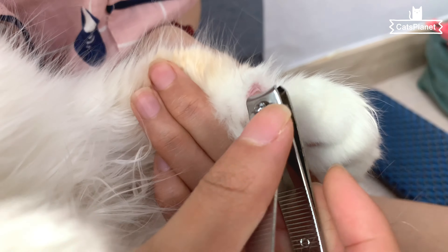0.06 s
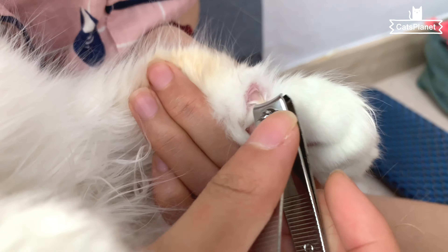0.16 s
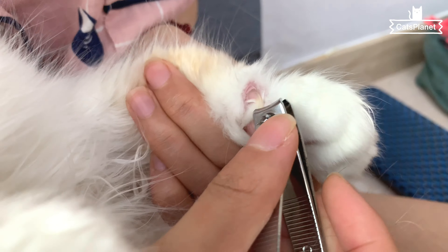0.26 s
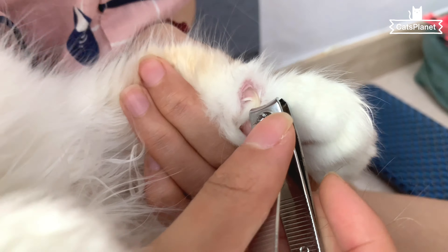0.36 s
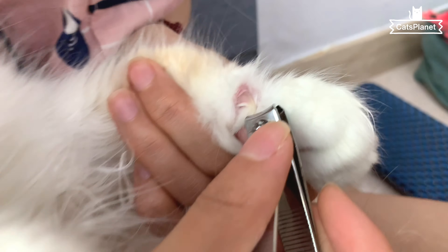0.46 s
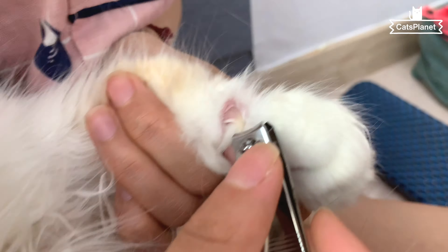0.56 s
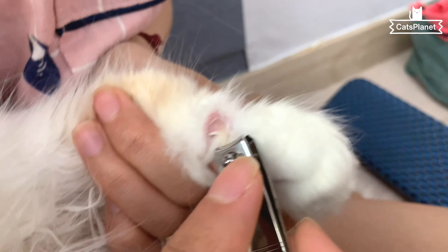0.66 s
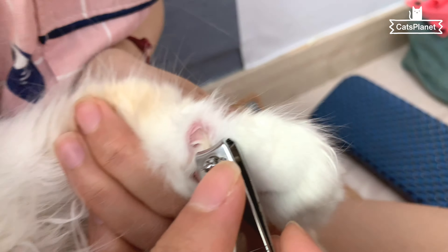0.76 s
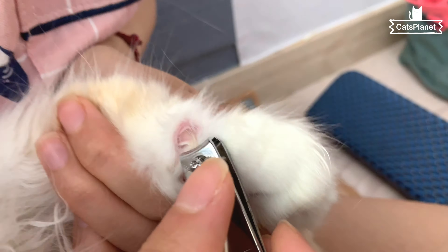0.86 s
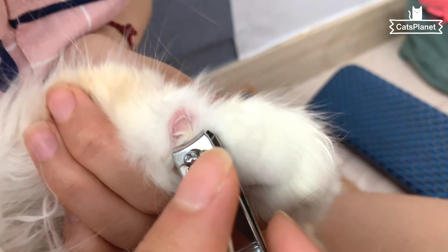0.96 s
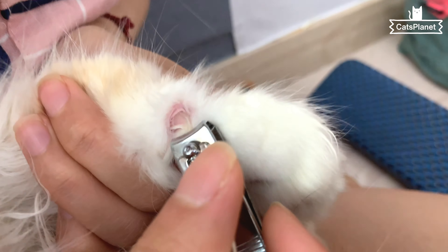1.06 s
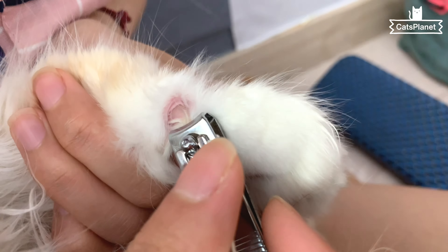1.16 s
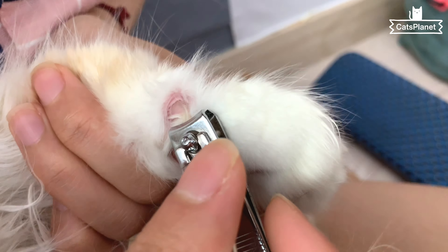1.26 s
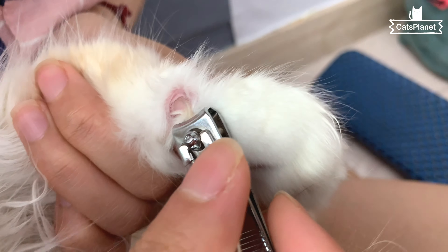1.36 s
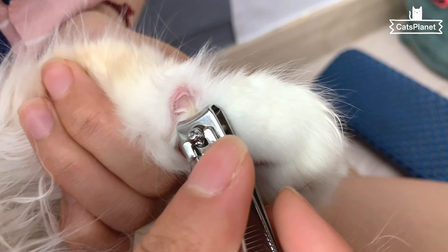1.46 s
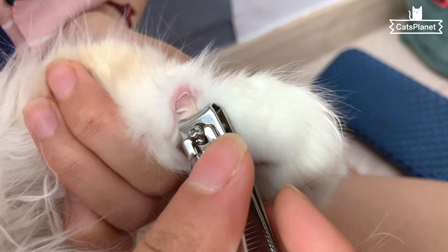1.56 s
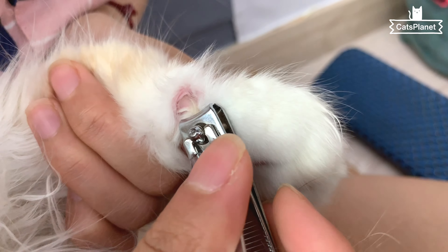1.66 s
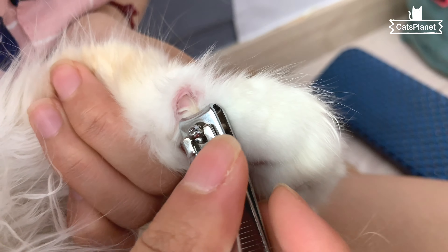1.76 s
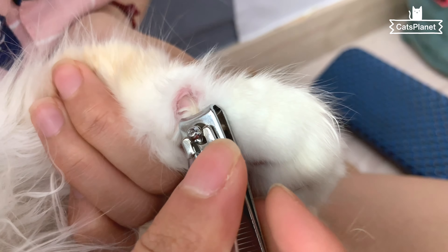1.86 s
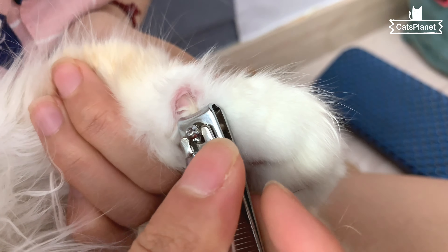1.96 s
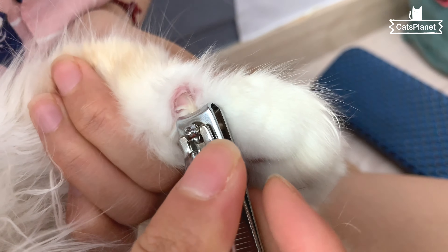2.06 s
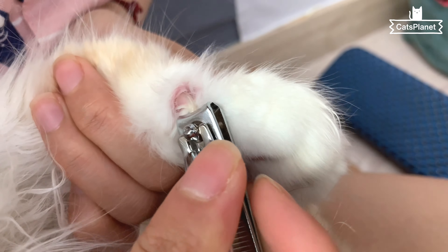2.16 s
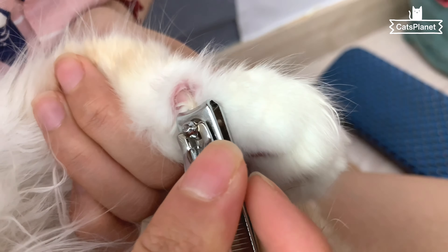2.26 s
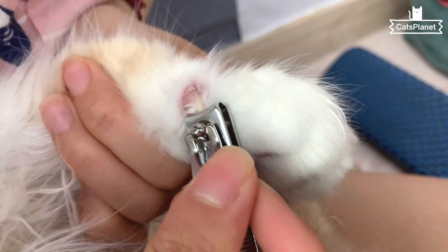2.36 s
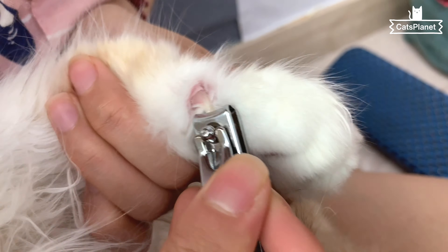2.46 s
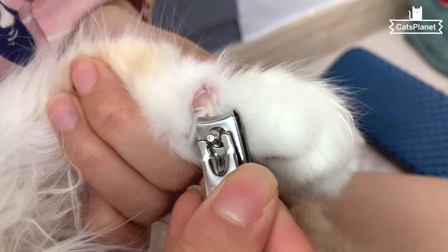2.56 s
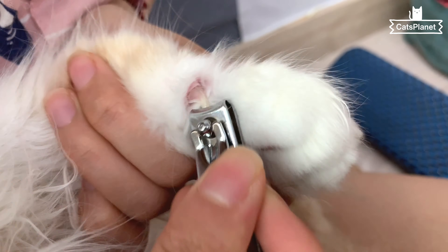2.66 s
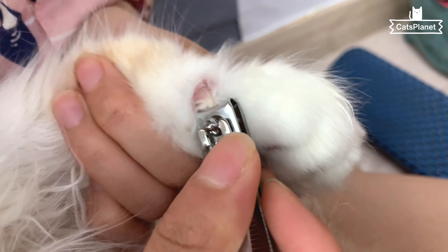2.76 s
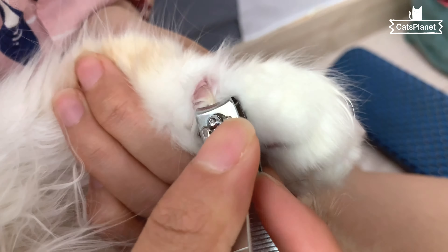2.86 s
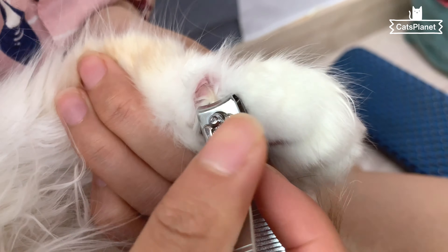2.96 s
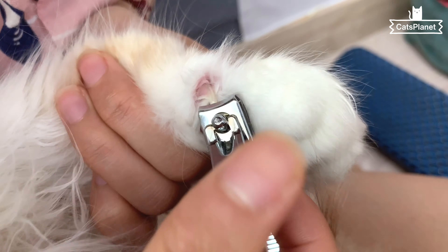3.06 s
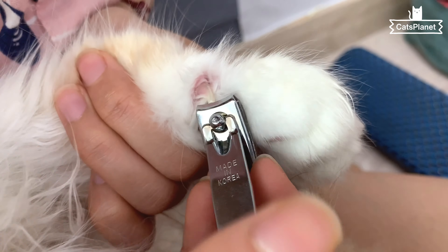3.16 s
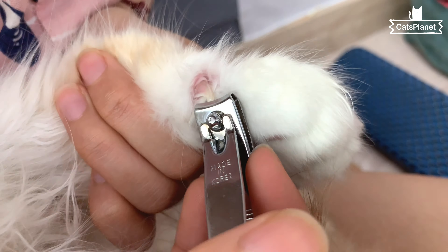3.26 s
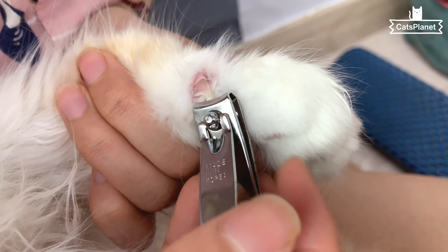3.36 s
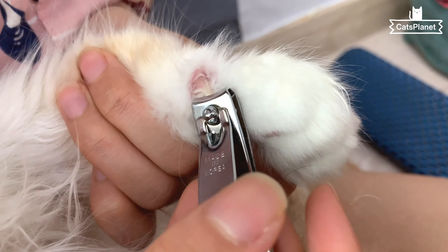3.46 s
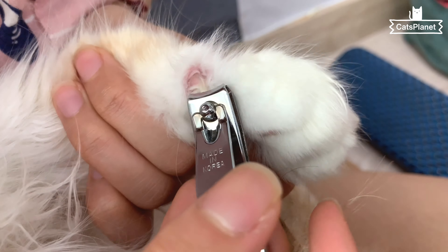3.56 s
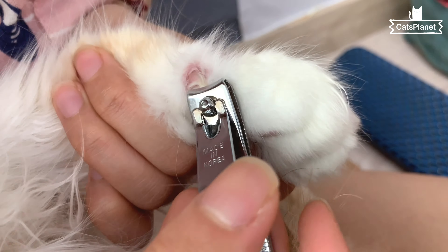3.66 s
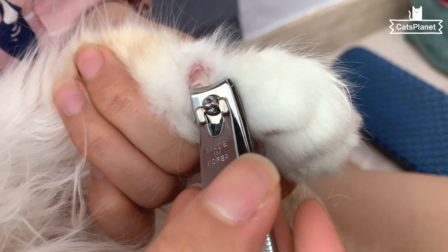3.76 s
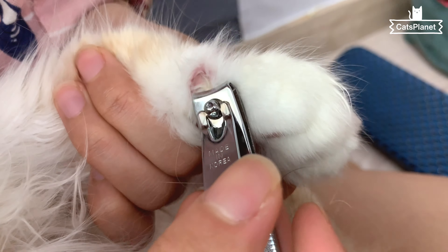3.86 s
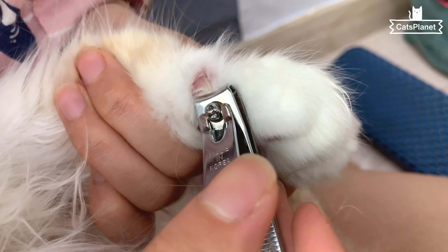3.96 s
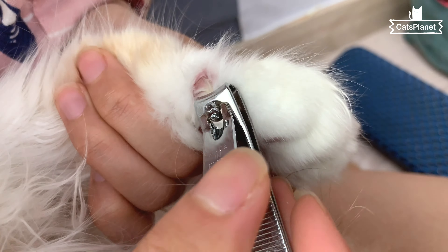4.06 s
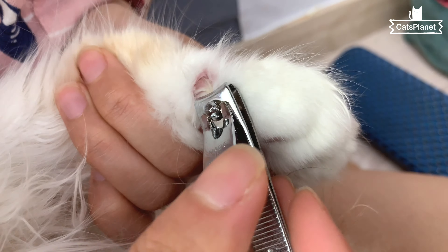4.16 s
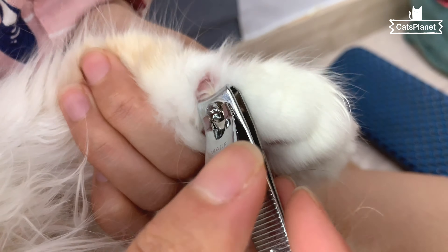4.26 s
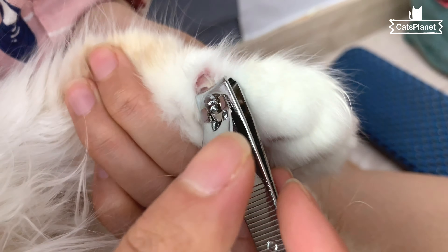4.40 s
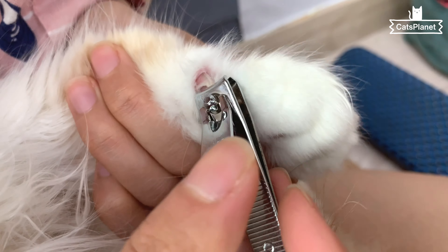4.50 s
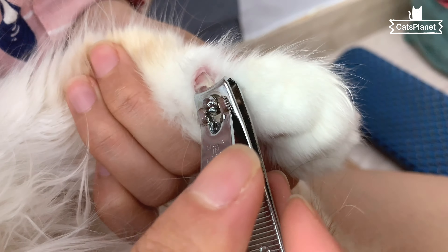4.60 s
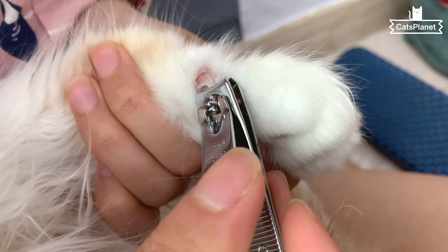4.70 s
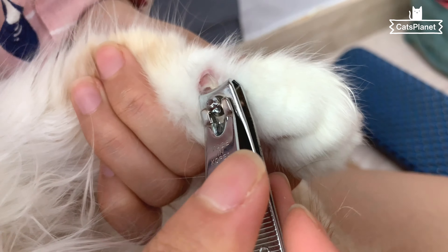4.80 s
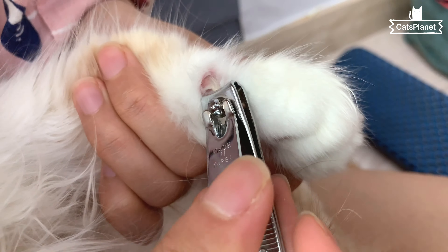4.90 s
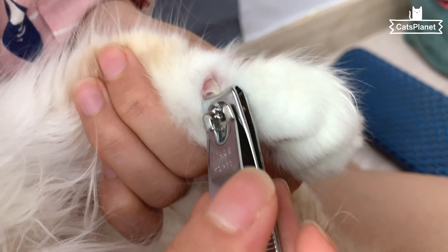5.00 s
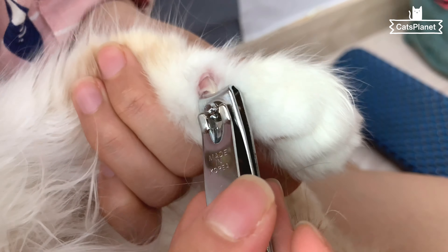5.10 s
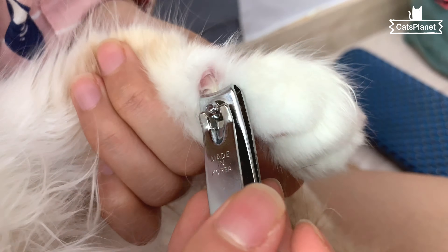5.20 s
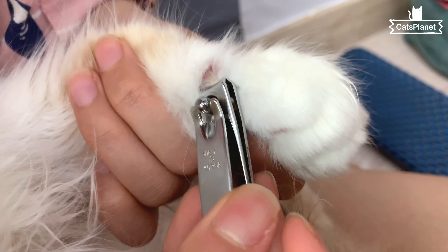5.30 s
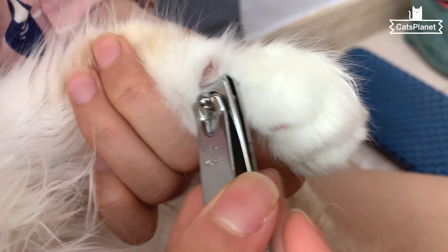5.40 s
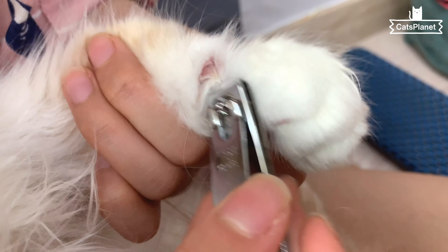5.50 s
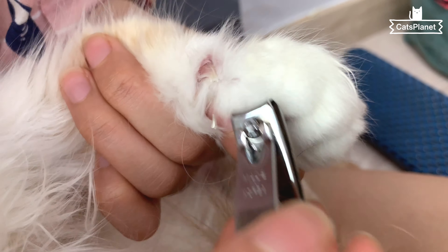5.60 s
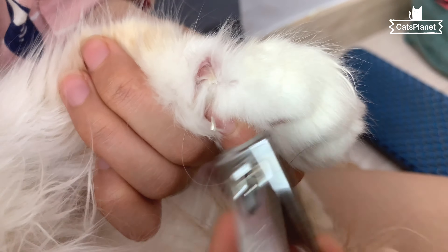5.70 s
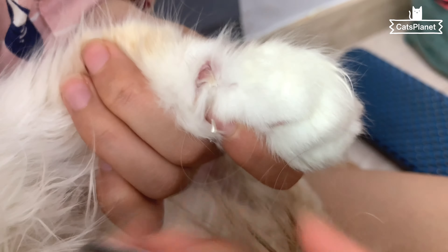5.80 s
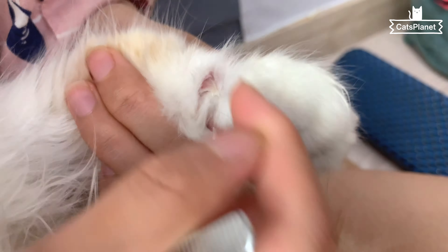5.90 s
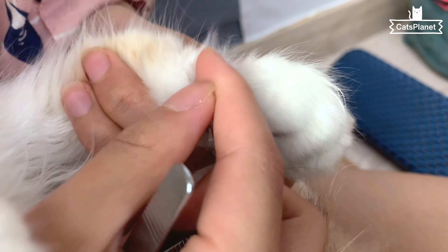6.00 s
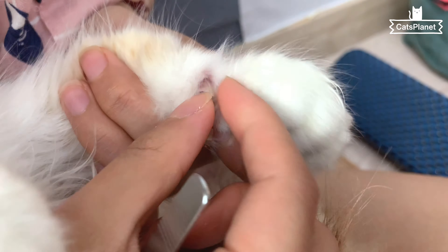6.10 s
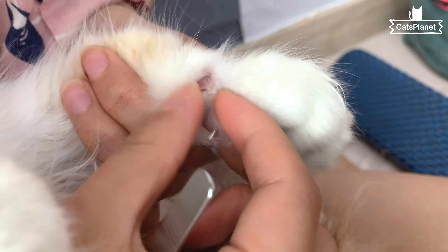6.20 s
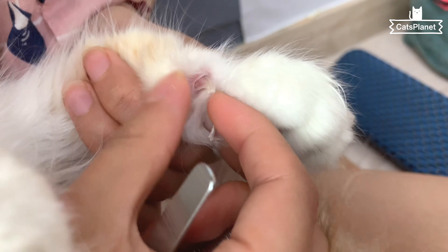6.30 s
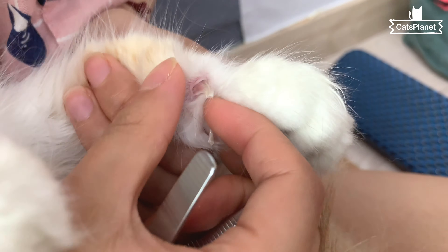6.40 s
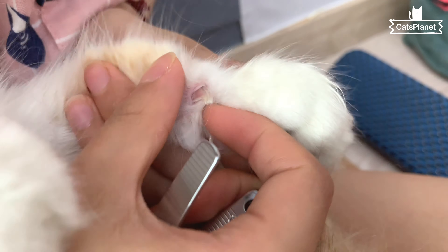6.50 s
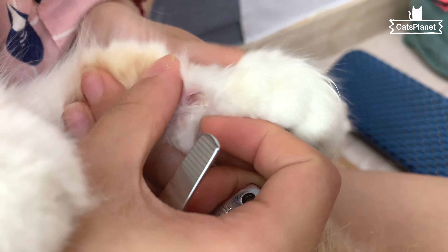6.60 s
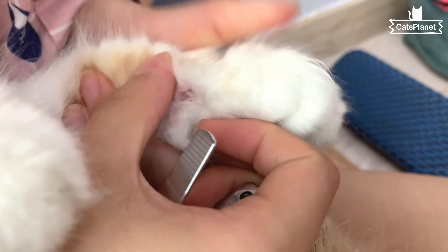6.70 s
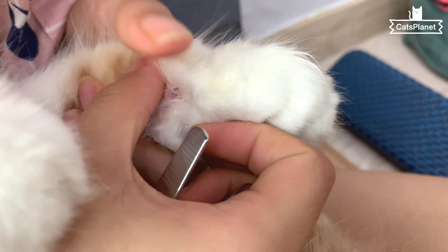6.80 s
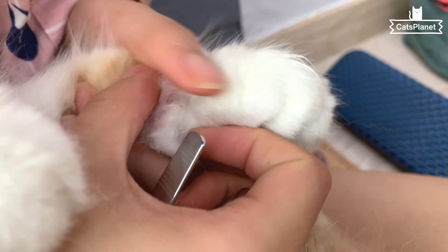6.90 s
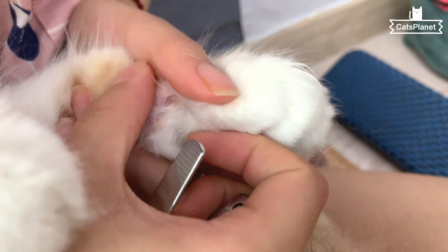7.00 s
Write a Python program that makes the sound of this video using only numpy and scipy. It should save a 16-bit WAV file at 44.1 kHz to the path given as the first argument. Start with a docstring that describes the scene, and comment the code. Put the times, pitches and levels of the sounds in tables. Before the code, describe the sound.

A low steady ventilation rumble with soft hum and faint hiss runs throughout, heard by a close stereo microphone in a small room. Tiny metallic ticks come at 0.6 to 1.0 s, and a faint squeaky scrape and rattle from 1.6 to 1.9. At 1.96 a dull knock, then at 2.14 a crisp crack of claw. From 2.25 to 2.7 the clipper jaws tick irregularly, with gritty crackle and small squeaks; sharper clicks stand out at 2.28, 2.43 and 2.63. Light taps and lever rattles follow until 3.15. Then mostly rumble, with a soft tap at 3.67 and a very faint one at 4.69. From 4.94 small ticks and crackles build; a crack at 5.26 with a short squeak leads into the loudest snap at 5.285, with bright steel ringing about a quarter second and a low jolt. A chip ticks down at 5.39. Faint rattle and rubbing at 5.6 to 6.1, a barely audible tap at 6.88, rumble to about 7 s.

```python
"""A low, steady room rumble with hum and faint hiss comes first; then a small steel clipper ticks on a cat's claw.
The jaws scrape, squeak and rattle; the claw crackles, cracks once, then snaps off as the steel rings; a chip lands.
Breaks, grains and crackle are noise bursts driven through resonances of steel and claw; knocks are short sine swings.
Two nearby microphone ports hear it all, with sparse room reflections; a gain control dips after loud sounds."""
import sys
import numpy as np
from scipy import signal
from scipy.fft import rfft, irfft
from scipy.io import wavfile
from scipy.ndimage import uniform_filter1d

SR = 44100
rng = np.random.default_rng(int(sys.argv[2]) if len(sys.argv) > 2 else 0)


def transcribe(signal):
    """Save signal, clipped to [-1, 1], as a 16-bit WAV file at the path in sys.argv[1]."""
    frames = np.atleast_2d(signal).T
    limited = np.clip(frames, -1, 1)
    pcm = np.round(limited * 32767).astype(np.int16)
    wavfile.write(sys.argv[1], SR, pcm)


N = 310905

# The jaws slip and tick: (time [s], level [dB], extra level of the three lower rings [dB])
TICKS = [(0.641, -42.5, 4.5), (0.744, -33.5, -3), (1.039, -49.5, 2), (2.042, -44, 0.5), (2.046, -42.5, -8),
         (2.1085, -46, -4.5), (2.1237, -38.5, 4), (2.2492, -29.5, -0.5), (2.2672, -36, -0.5),
         (2.2755, -26, -5), (2.2788, -16, 0), (2.289, -36.5, 3), (2.311, -46.5, 6), (2.323, -31.5, 8),
         (2.3334, -45, 9.5), (2.3446, -36.5, 8.5), (2.362, -44.5, 12.5), (2.404, -40, 13), (2.422, -46, 11),
         (2.4315, -12.5, 7), (2.4943, -30.5, 3.5), (2.505, -38.5, 3), (2.5108, -33.5, 5),
         (2.548, -46, -0.5), (2.556, -31, 0), (2.569, -45.5, 6), (2.629, -7.5, -4.5), (2.646, -24, 4),
         (2.6799, -31.5, -2), (4.935, -42.5, 5.5), (4.953, -50.5, 1.5), (5.095, -29, -8),
         (5.1384, -47, -3.5), (5.152, -45, -1.5), (5.184, -22.5, -6.5), (5.193, -36, -2.5),
         (5.217, -27, -1), (5.222, -37, -8.5), (5.2374, -43.5, -4), (5.2474, -29, -9.5)]
# A slip excites the top of the steel most: levels of the (top, high, middle, low) ring [dB]
TICK_COLOUR_DB = (-3.5, -23.5, -14.5, -35.5)
# The slack lever rattles on its pin: (time [s], level [dB], centre [Hz], ping level [dB])
RATTLES = [(1.7797, -56, 9860, -44.5), (1.818, -51, 9750, -41), (1.835, -54, 10100, -48),
           (1.857, -49, 10400, -41.5), (2.878, -32.5, 8550, -39), (2.942, -41.5, 7650, -39),
           (3.074, -49, 10720, -34), (3.107, -47, 8660, -46.5), (3.123, -62, 10600, -54),
           (3.137, -51, 10640, -47), (5.615, -34, 10500, -55)]
# The claw fractures, in several stages at the final snap: (time [s], top ring [dB], high ring [dB],
# middle ring [dB], low ring [dB], tearing time scale [ms], send to the room [dB], free ring [dB])
CRACKS = [(2.137, -12, -16.5, -19.5, -21, 1.4, -19, -42), (5.257, -11, -28, -21, -21, 0.52, -26.5, -38.5),
          (5.2831, -28.5, -32.5, -15, -24.5, 1.6, -19.5, -36.5),
          (5.2848, -8, -19, -14.5, -27, 0.79, -12.5, -23),
          (5.2878, -15.5, -13.5, -28.5, -19, 0.3, -14.5, -40)]


def bites(tick_tear_ms=0.173, rattle_tear_ms=0.33, tick_room_db=-24, rattle_room_db=-22):
    """Ticks, rattles and cracks break sharply against the steel; also returns the share sent into the room."""
    hits = []
    for s, db, body_db in TICKS:
        body = body_db * np.array([0, 1, 1, 1])
        hits.append((s, db + np.array(TICK_COLOUR_DB) + body, tick_tear_ms, tick_room_db))
    for s, db, centre_hz, _ in RATTLES:
        hits.append((s, db + contact(centre_hz), rattle_tear_ms, rattle_room_db))

    near, spread = np.zeros((2, N))
    steel = free_ring()
    for s, *levels_db, tear_ms, room_db, ring_db in CRACKS:
        hits.append((s, levels_db, tear_ms, room_db))
        add(near, s, gain_of(ring_db) * steel)

    for s, levels_db, tear_ms, room_db in hits:
        sound = slip(s, levels_db, tear_ms)
        add(near, s, sound)
        add(spread, s, gain_of(room_db) * sound)
    return near, spread


# Resonances of the clipper with the claw in it, in four groups:
# (frequency [Hz], width of each filter pass [Hz], relative level [dB])
TOP_RING = [(12100, 860, 4), (12290, 790, -2.5), (13790, 905, 0), (14260, 600, -1), (15270, 730, -4)]
HIGH_RING = [(8510, 1400, 0.5), (9940, 1460, 2)]
MIDDLE_RING = [(6633, 2600, -5), (7250, 1300, 7.5), (8000, 345, 0)]
LOW_RING = [(999, 1600, -3), (1799, 1460, 1.5), (2866, 2700, 2), (3910, 1990, 1), (5200, 1700, 3)]
# Pitch of the first top resonance during slips: (time [s], frequency [Hz])
JAW_PITCH = [(.7, 12200), (2.13, 11400), (2.3, 11570), (2.43, 11680), (2.63, 11870), (5.25, 11760)]


def slip(s, levels_db, tear_ms, after_db=-17, after_ms=5, colour_db=2.5):
    """A sharp break, smeared over the tearing time, rings the steel; the grip retunes and recolours it each time."""
    ms = 1000 * np.arange(2048) / SR
    # each frequency of the click arrives with its own random delay
    scatter = evened(signal.oaconvolve(rng.standard_normal(1040), np.hanning(16), "valid"))
    delay = SR / 1000 * (.15 + tear_ms * abs(scatter) * .7)  # samples
    phase = 2 * np.pi * np.cumsum(delay) / len(ms)
    tear = irfft(np.exp(-1j * phase)) * (ms < 20)
    crumbs = rng.standard_normal(len(ms)) * np.exp(-ms / after_ms)
    force = evened(tear) + gain_of(after_db) * evened(crumbs)

    grip = 1 + 0.007 * rng.standard_normal()
    jaw_hz = np.interp(s, *np.transpose(JAW_PITCH))
    top = [(jaw_hz, *TOP_RING[0][1:]), *TOP_RING[1:]]
    out = 0
    for db, modes in zip(levels_db, (top, HIGH_RING, MIDDLE_RING, LOW_RING)):
        gripped = [(hz * grip, width_hz, mode_db + colour_db * rng.standard_normal())
                   for hz, width_hz, mode_db in modes]
        tone = ring(force, gripped)
        loudness = np.sqrt(np.sum(tone ** 2) / (.004 * SR))  # its energy as if packed into 4 ms
        out = out + gain_of(db) * tone / loudness
    return out


# The steel rings on once the jaws are freed, in clusters of close partials:
# (frequency [Hz], spread to either side [Hz], relative level [dB], time to fall by 60 dB [s])
FREE_RING = [(1810, 270, -30, 0.285), (2880, 15, -27.5, .26), (3354, 20, -28.5, .26),
             (3700, 110, -26.5, .22), (4115, 15, -30.5, 0.24), (4320, 13, -22.5, 0.29),
             (4460, 40, -22, .28), (5150, 36, -22, .28), (5860, 28, -21, 0.27), (6245, 34, -22.5, .3),
             (6660, 60, -20, 0.26), (7130, 97, -19.5, 0.27), (8250, 88, -17.5, .28),
             (8900, 500, -17.5, .26), (10100, 700, -11.5, .26), (12450, 400, -16, 0.22),
             (13300, 550, -7.5, .25), (14200, 400, -1.5, 0.29), (14700, 70, -2.5, .25),
             (14600, 190, 2.5, .23), (15070, 120, 12.5, 0.022)]


def free_ring(count=10):
    """The long, thin modes of the released clipper; close partials beat against each other."""
    t, out = np.arange(SR // 2) / SR, 0
    for hz, spread_hz, db, t60 in FREE_RING:
        place, phase = rng.random((2, count, 1))
        offset = 2 * (np.arange(count)[:, None] + place) / count - 1
        partials_hz = hz + spread_hz * offset
        fade = gain_of(-60 * t / t60)
        cluster = np.sin(2 * np.pi * (partials_hz * t + phase)).sum(0) * fade
        out = out + gain_of(db) * cluster * np.linalg.norm(fade) / np.linalg.norm(cluster)
    return out


# The blades press into the claw and it crackles: (start [s], length [s], level [dB])
SQUEEZES = [(2.04, 0.21, -64), (2.239, 0.36, -56), (2.628, .04, -56.5), (4.94, 0.16, -70),
            (5.081, 0.13, -61.5), (5.225, 0.038, -53.5), (5.26, 0.023, -36.5)]
# Crackle under pressure: levels in the (top, high, middle) ring and in the claw [dB]
SQUEEZE_COLOUR_DB = (-6, -12.5, -13, -13)
# The claw itself as the blade drags over it:
# (frequency [Hz], width of each filter pass [Hz], relative level [dB])
CLAW_RING = [(1320, 910, -3), (2420, 640, 0), (3020, 550, -5.5), (4070, 500, -1), (5200, 900, -6)]


def crackle(size_db=4, edge_s=0.0045, breaks_per_s=240):
    """Under pressure the claw gives in separate tiny breaks, each ringing one part of the steel or the claw."""
    t, pressure, out = np.arange(N) / SR, 0, 0
    for start, length, db in SQUEEZES:
        to_edge = np.minimum(t - start, start + length - t)
        pressure = pressure + gain_of(db) * np.clip(to_edge / edge_s, 0, 1)

    for db, modes in zip(SQUEEZE_COLOUR_DB, (TOP_RING, HIGH_RING, MIDDLE_RING, CLAW_RING)):
        group = 0
        for mode in modes:  # every resonance has its own breaks
            sizes = gain_of(size_db * rng.standard_normal(N))
            breaks = sizes * (rng.random(N) < breaks_per_s / SR)
            group = group + ring(breaks, [mode])
        out = out + gain_of(db) * evened(group)
    return pressure * out


# The steel slides over claw and fur, swelling and fading: (start [s], length [s], level [dB], centre [Hz])
RUBS = [(1.643, 0.33, -62.5, 10000), (1.959, 0.043, -63, 10500), (2.251, 0.16, -54, 14700),
        (2.43, 0.15, -52.5, 14470), (2.634, 0.071, -51, 14400), (2.316, 0.29, -55, 3130),
        (2.404, 0.12, -56, 7500), (2.617, 0.087, -51.5, 3900), (2.82, 0.054, -49, 5000),
        (3.04, 0.15, -57, 8700), (5.1, 0.093, -71, 3500), (5.6, 0.48, -66.5, 3980)]


def scrape(grain_db=7.5, clump_db=4):
    """Friction in clumps of tiny grains rings the steel and the claw during rubs."""
    levels = np.zeros((4, N))
    for start, length, db, centre_hz in RUBS:
        levels += np.outer(gain_of(db + contact(centre_hz)), arch(start, length) ** 2)
    grains = grain_db * np.minimum(drift(size=30), 2)
    clumps = clump_db * np.minimum(drift(size=250), 1)
    force = rng.standard_normal(N) * gain_of(grains + clumps)
    # the claw takes the place of the low ring
    groups = (TOP_RING[2:], HIGH_RING, MIDDLE_RING, CLAW_RING)
    return sum(level * evened(ring(force, modes)) for level, modes in zip(levels, groups))


# Squeaks of steel on the claw and of handling the clipper:
# (start [s], length [s], first pitch [Hz], last pitch [Hz], level [dB], rms pitch jitter [share])
SQUEAKS = [(0.73, 0.043, 3840, 3600, -62, .008), (1.665, 0.27, 9570, 10500, -61, 0.025),
           (2.269, 0.17, 7070, 7120, -53, 0.035), (2.382, 0.16, 2463, 3130, -51, 0.08),
           (5.261, 0.039, 7700, 8100, -31, 0.0029), (3.692, 0.12, 6620, 6980, -67, .02),
           (4.08, 0.39, 9280, 9350, -74.5, 0.017), (5.613, 0.14, 3630, 4000, -61.5, 0.0256),
           (5.65, .08, 7440, 7900, -63, .016), (5.74, 0.24, 8460, 8900, -70, 0.016)]


def squeak(octave_db=-11):
    """Faint squeaking tones with their octave; each glides evenly, with jitter, as it swells and fades."""
    t, out = np.arange(N) / SR, 0
    for start, length, from_hz, to_hz, db, jitter in SQUEAKS:
        glide_hz = np.interp(t, [start, start + length], [from_hz, to_hz])
        angle = 2 * np.pi * np.cumsum(glide_hz * (1 + jitter * drift(size=30))) / SR
        tone = np.sin(angle) + gain_of(octave_db) * np.sin(2 * angle)
        out = out + gain_of(db) * arch(start, length) ** 2 * tone
    return out


# Short rings of the slack lever: (frequency [Hz], level relative to its ping [dB])
LEVER_RING = [(7550, -10), (8700, -12), (10500, -8.5), (13200, -17)]


def pings(swell_ms=0.8, falloff_db=14):
    """Each rattle leaves a narrow ping at its centre and briefly rings the nearest modes of the lever."""
    rows = []
    for s, _, centre_hz, ping_db in RATTLES:
        for hz, mode_db in [(centre_hz, 0), *LEVER_RING]:
            octaves = abs(np.log2(hz / centre_hz))
            rows.append((s, hz, ping_db + mode_db - falloff_db * octaves, swell_ms))
    return blows(rows)


# Light taps, with a little room after them:
# (time [s], swell time constant [ms], resonances of the touched spot as (frequency [Hz], level [dB]))
TAPS = [(1.9645, 0.21, [(950, -26.5), (1600, -29), (2600, -36), (3700, -43)]), (2.151, 0.68, [(850, -44),
        (1400, -36)]), (2.8438, 0.23, [(3700, -36), (5350, -34), (8150, -36), (10800, -38)]),
        (2.877, 0.22, [(2700, -40), (3900, -39.5), (6400, -21.5)]), (3.6687, 0.61, [(1120, -33.5),
        (2290, -35), (3090, -33.5)]), (4.686, 0.54, [(2450, -44), (4950, -49), (7900, -49.5), (9600, -50),
        (11400, -42)]), (5.143, .4, [(2600, -51)]), (5.615, 0.43, [(2150, -41), (3090, -47)]),
        (6.876, 1, [(2500, -51.5), (3180, -52.5)])]


def taps():
    """Each tap rings the few short resonances of the spot that is touched."""
    return blows([(s, hz, db, swell_ms) for s, swell_ms, modes in TAPS for hz, db in modes])


# Knocks of handling, low pops of the cracking claw, and the landing chip:
# (time [s], frequency [Hz], level [dB], swell time constant [ms])
KNOCKS = [(1.965, 416, -20.5, 1.13), (2.1372, 380, -26, 0.51), (2.1515, 380, -26, 1.4), (2.648, 53, -25, 5),
          (5.059, 800, -30, 0.2), (5.2855, 1829, -14.5, 0.58), (5.394, 4780, -32, 0.61)]
# The hand jolts as the claw gives way: (time [s], frequency [Hz], level [dB], swell time constant [ms])
JOLTS = [(5.293, 47, -12.5, 4.9), (5.298, 151, -14.5, 1.1), (5.286, 500, -22, 0.87)]


def blows(rows):
    """Each blow is a short sine swing that swells to its level in two time constants and dies."""
    out, t = np.zeros(N), np.arange(SR // 5) / SR
    for s, hz, db, swell_ms in rows:
        u = 1000 * t / swell_ms
        envelope = (u / 2) ** 2 * np.exp(2 - u)
        add(out, s, gain_of(db) * np.sin(2 * np.pi * hz * t) * envelope)
    return out


# Decay of the reflections: (frequency [Hz], time to fall by 60 dB [s])
ROOM_DECAY = [(300, 0.61), (2000, 0.11), (5000, 0.37), (10000, 0.292), (15000, 0.21)]
# Tone of the reflections: (frequency [Hz], relative level [dB])
ROOM_COLOUR = [(200, 2), (900, -4.5), (1900, 2), (3500, -1), (4300, -4), (5200, -5), (7000, -9.5),
               (10000, 1.5), (12000, -10.5), (13700, -2.5), (14750, -2), (15400, 4.5), (15900, -15.5)]


def room(x, build_s=0.0086):
    """Sparse reflections thicken after a short while and die away band by band."""
    echoes = rng.standard_normal((2, SR)) * (rng.random((2, SR)) < .15)
    hz, t, z = signal.stft(echoes, SR, nperseg=256)
    colour_db = read(ROOM_COLOUR, hz)[:, None]
    decay_db = 60 * t / read(ROOM_DECAY, hz)[:, None]
    build = 1 - np.exp(-(t / build_s) ** 2)
    tail = signal.istft(z * gain_of(colour_db - decay_db) * build, SR, nperseg=256)[1]
    return signal.fftconvolve(x, tail / np.linalg.norm(tail[0]), axes=1)[:, :N]


# Rumble spectrum, before a further roll-off around 2300 Hz: (frequency [Hz], relative density [dB])
RUMBLE = [(12, -39), (25, -4), (36, -30), (48, -2.5), (72, -4), (110, -6), (145, -13.5), (220, -13.5),
          (310, -20.5), (420, -20.5), (620, -32), (1050, -33), (1500, -45), (2300, -47.5)]
# Hiss spectrum: (frequency [Hz], relative density [dB])
HISS = [(1500, -12.5), (2800, -5.5), (4150, 1), (4550, 6), (4950, 0), (6400, -0.5), (9000, -3.5),
        (15600, -6), (16100, -37.5)]
# Mains and fan, before the slow swell: (frequency [Hz], level [dB])
HUM = [(48.5, -42), (59, -45.5), (120, -50), (259, -57.5)]
# Shape of the slow swell, taken about its median and scaled by the swell share: (time [s], level [dB])
FLOOR = [(0.0, -43.5), (0.59, -40.5), (3.85, -39), (4.63, -39), (4.99, -36.5), (5.18, -37), (5.421, -44.5),
         (7.05, -43)]


def room_noise(rumble_db=-39.5, hiss_db=-67.5, swell_share=.55, flutter_db=1, waver=0.47):
    """Ventilation rumble with a wavering hum, over a faint hiss."""
    hz, t = np.fft.rfftfreq(N, 1 / SR), np.arange(N) / SR
    white = rfft(rng.standard_normal((2, N)))
    rumble = evened(irfft(white * gain_of(read(RUMBLE, hz)) / (1 + (hz / 2300) ** 4), N))
    hiss = evened(irfft(white * gain_of(read(HISS, hz)), N))
    hum = 0
    for hum_hz, db in HUM:
        strength = 1 + waver * drift(size=6000)
        hum = hum + gain_of(db) * evened(strength * np.sin(2 * np.pi * hum_hz * t + drift(size=9000)))

    s, floor_db = np.transpose(FLOOR)
    swell = gain_of(swell_share * np.interp(t, s, floor_db - np.median(floor_db)))
    fluttering = gain_of(rumble_db + flutter_db * drift(size=2000)) * rumble
    return swell * (fluttering + shared(hum)) + gain_of(hiss_db) * hiss


# How alike the two ports hear: (frequency [Hz], likeness from 0 to 1)
LIKENESS = [(40, 0.96), (200, 0.88), (400, 0.88), (700, 0.39), (1500, 0.19), (3200, 0.5), (5000, 0.54),
            (7000, 0.5), (9500, 0.87), (11400, 1), (15000, 0.74)]
# Overall lean of the two ports: (frequency [Hz], left minus right [dB])
BALANCE = [(60, -3), (250, -.5), (500, 1.5), (2000, -.5), (4000, 0.5), (7000, -0.5), (9500, -.5),
           (14000, -0.5), (16000, -3.5)]
# The left port hears later: (frequency [Hz], phase lag [radians])
PORT_LAG = [(20, 0), (600, 0.06), (1900, 2.5), (2350, 4.5), (4000, 6), (5300, 9), (6400, 6), (7400, 3.5),
            (8300, 7.5), (9500, 6.5), (11400, 9.5), (13800, 12.5), (15800, 17.5)]


def ports(x):
    """Blends a common and a scattered part into two microphone ports, the left one lagging."""
    hz = np.fft.rfftfreq(N, 1 / SR)
    same = np.clip(read(LIKENESS, hz), 0, 1)
    common, scattered = rfft(x) * np.sqrt([(1 + same) / 2, (1 - same) / 2])
    lean = gain_of(read(BALANCE, hz) / 2)
    left = (common + scattered) * lean * np.exp(-1j * read(PORT_LAG, hz))
    right = (common - scattered) / lean
    return irfft(np.array([left, right]), N)


# Shade of the housing on the clipper's direct sound: (frequency [Hz], left minus right [dB])
SHADE = [(1000, 1), (4000, -3.5), (6200, -12.5), (7400, -4.5), (8400, -4), (9500, -0.5)]


def shaded(x):
    """The housing shades the left port from the nearby clipper."""
    lean = gain_of(read(SHADE, np.fft.rfftfreq(N, 1 / SR)) / 2)
    return irfft(rfft(x) * np.array([lean, 1 / lean]), N)


def gain_control(x, above_db=-27, duck_share=0.46, sense_s=0.22, hold_fall_db_per_s=18.5):
    """Gain that drops by a share of the excess of the smoothed power, whose held peak then falls slowly."""
    keep = np.exp(-1 / (sense_s * SR))
    power = signal.lfilter([1 - keep], [1, -keep], (x ** 2).mean(0))
    power_db = 10 * np.log10(power + 1e-12)
    fall_db = hold_fall_db_per_s * np.arange(N) / SR
    held_db = np.maximum.accumulate(power_db + fall_db) - fall_db
    return gain_of(-duck_share * np.maximum(held_db - above_db, 0))


# Where each ring answers a light contact best: centres of the (top, high, middle, low) ring [Hz]
RING_CENTRES_HZ = (13300, 9900, 6930, 3090)


def contact(centre_hz, falloff_db_per_octave=12):
    """Levels in dB of the four rings: a light contact excites those nearest its centre."""
    return -falloff_db_per_octave * abs(np.log2(np.array(RING_CENTRES_HZ) / centre_hz))


def ring(force, modes):
    """Passes a force twice through each damped resonance, for steep skirts."""
    out = 0
    for hz, width_hz, db in modes:
        section = np.concatenate(signal.iirpeak(min(hz, .45 * SR), hz / width_hz, fs=SR))
        out = out + gain_of(db) * signal.sosfilt([section, section], force)
    return out


def arch(start, length):
    """A stroke that swells and fades as half a sine."""
    out = np.zeros(N)
    add(out, start, np.sin(np.pi * np.arange(0, length, 1 / SR) / length))
    return out


def drift(size):
    """Random wander of unit rms, smooth over size samples."""
    return evened(uniform_filter1d(uniform_filter1d(rng.standard_normal(N), size), size))


def shared(x):
    """A sound with a common part only, none scattered."""
    return np.array([x, np.zeros(N)])


def gain_of(db):
    """Decibels to amplitude."""
    return 10 ** (np.asarray(db) / 20)


def evened(x):
    """Scales to unit rms."""
    return x / np.sqrt(np.mean(x ** 2) + 1e-20)


def read(points, hz):
    """Reads a spectrum on a log-frequency axis."""
    f, value = np.transpose(points)
    return np.interp(np.log(hz + 1), np.log(f + 1), value)


def add(mix, s, sound):
    """Lays a sound into the mix at s seconds."""
    part = mix[round(s * SR):][:len(sound)]
    part += sound[:len(part)]


def scene():
    """Clipper, hands and room, each as a common part and a part scattered by hands and fur."""
    near, spread = np.stack([bites(), bites()], axis=1)
    rubbing = np.array([scrape(), scrape()]) + shared(crackle())
    knocks = blows(KNOCKS) + taps()
    handling = shared(knocks + blows(JOLTS) + squeak() + pings())
    direct = shaded(ports(near + rubbing + handling))
    reflections = room(spread + gain_of(-16.5) * knocks)
    return direct + ports(reflections + room_noise())


def record(dry, edge_hz=16600):
    """Gain control; the loudest peaks are rounded off near full scale; then the band limit."""
    ducked = dry * gain_control(dry)
    rounded = ducked / (1 + (ducked / .9) ** 4) ** .25
    lowpass = signal.firwin(255, edge_hz, window=("kaiser", 9), fs=SR)
    return signal.oaconvolve(rounded, lowpass[None], "same")


dry = scene()
out = record(dry)
transcribe(out)
```